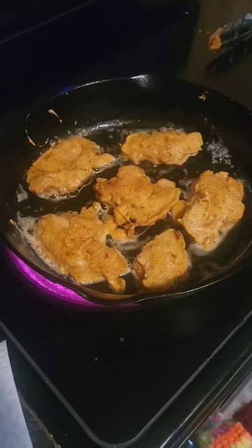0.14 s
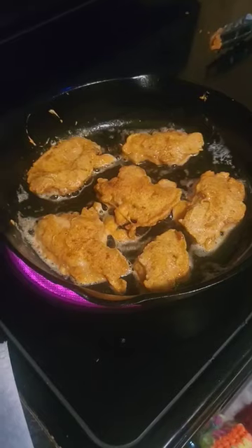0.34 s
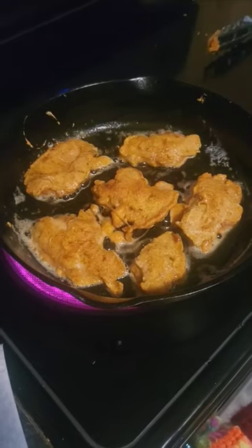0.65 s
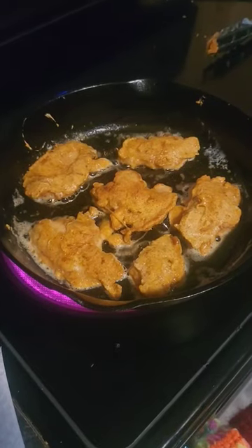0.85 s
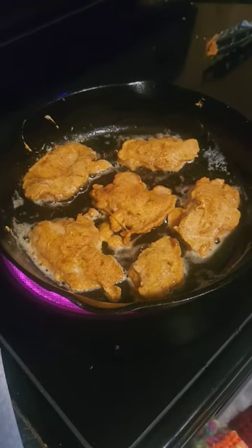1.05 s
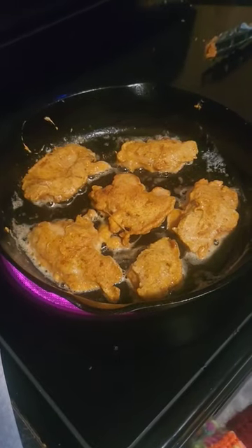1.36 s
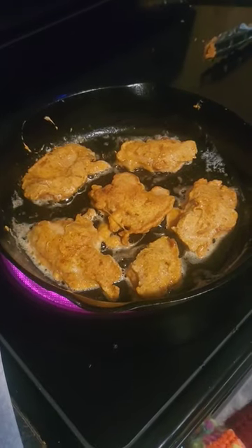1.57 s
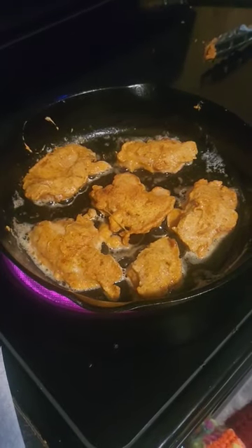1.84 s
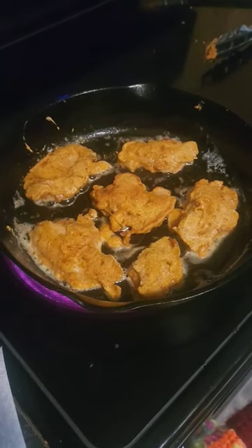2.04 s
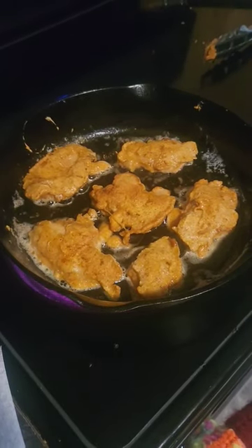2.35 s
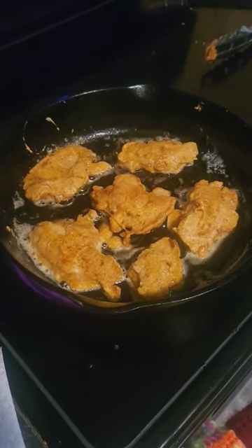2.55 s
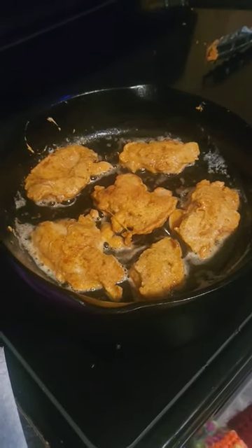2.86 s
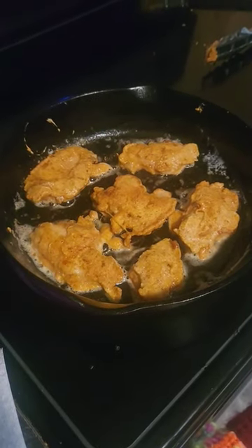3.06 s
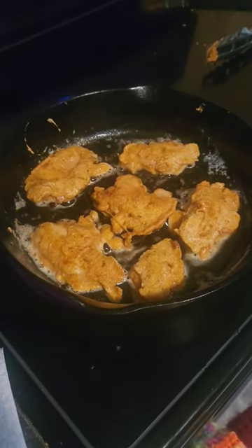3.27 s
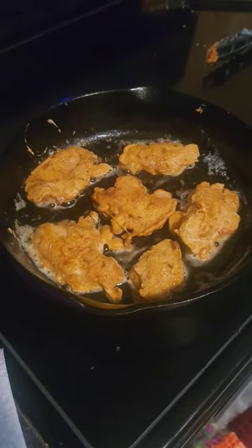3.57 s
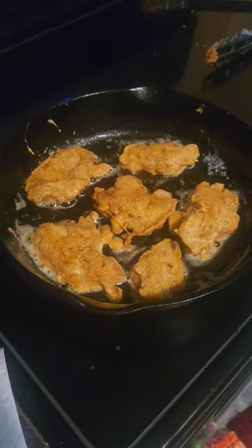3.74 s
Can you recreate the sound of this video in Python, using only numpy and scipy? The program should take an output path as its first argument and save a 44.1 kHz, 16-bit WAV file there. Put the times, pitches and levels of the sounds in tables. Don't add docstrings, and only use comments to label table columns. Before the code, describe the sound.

Breaded fish sizzles in a pan of oil, spitting and snapping over faint hood fan hum.

```python
import sys
import numpy as np
from scipy import signal
from scipy.fft import rfft, irfft, next_fast_len
from scipy.io import wavfile
from scipy.ndimage import uniform_filter1d, map_coordinates

SR = 44100
rng = np.random.default_rng(int(sys.argv[2]) if len(sys.argv) > 2 else 0)


def elevation(decibels):
    levels = np.asarray(decibels, float)
    return 10 ** (levels / 20)


def int16_out(signal):
    q = np.round(np.clip(np.atleast_2d(signal).T, -1, 1) * 32767)
    wavfile.write(sys.argv[1], SR, q.astype(np.int16))


N = 172431
START_S = .1617

# time_s, vigour_db, fine_spatter_over_it_db
BOIL_COURSE = [(.16, -50, -3.5), (.45, -51.5, -5), (.6, -51, -4.5), (.9, -52, -1), (1.1, -49.5, -4.5),
               (1.4, -52.5, -1), (1.63, -51, -4.5), (1.74, -53, -12.5), (1.9, -50, -9), (2.095, -49, -9),
               (2.11, -46, -1.5), (2.19, -48, 3), (2.36, -50, -2), (2.9, -50, -1), (3.25, -49.5, 1),
               (3.45, -49.5, -0.5), (3.7, -48.5, -3), (3.91, -51, -1)]
# start_s, peak_db, tilt_db_per_octave (bubble size), splutter_0_to_1
BIG_POPS = [(0.254, -20, -5, 0.6), (0.544, -18, 1, 0.3), (0.5804, -18.5, 2, 0.6),
            (0.7796, -16.5, -0.5, 0.6), (1.0236, -16.5, -6, 0.1), (1.0843, -14, -4, 0.7),
            (1.1827, -21, -10, 0.5), (1.3045, -31, 8, 0), (1.4591, -13, -1.5, 0.54),
            (1.5303, -14, -7.5, 0.23), (1.5415, -16.5, -4, 0.6), (1.6531, -20, 1, 0),
            (1.724, -23, -1.5, 0.6), (1.7944, -20, -5, 0.7), (1.8457, -31, 1, 0.5), (2.0255, -15, 0, 0),
            (2.0931, -10, -4.5, 0.3), (2.1083, -10.5, -17.5, 0.6), (2.183, -12, 3, 0.6),
            (2.336, -12, 0, 0.2), (2.5902, -9, -3.5, 0.2), (2.6454, -13, -0.5, 0.47),
            (2.7122, -21, -6, 0.8), (3.1578, -25, -11, 0.8), (3.2376, -13.5, -4.5, 0.97),
            (3.3756, -14, -3, 0), (3.6863, -10, 6, 0.8), (3.713, -5, 2.5, 0.2), (3.8078, -17, 0, 0.3),
            (3.8332, -14, -8.5, 0.32)]
# start_s, peak_db,
# tilt_db_per_octave
SMALL_SNAPS = [(0.2638, -19, -3), (0.396, -19, -4), (0.7617, -36, 3), (0.8709, -27, -2), (0.9767, -34, -6),
               (1.1362, -17, 4), (1.2815, -34, 9), (1.4451, -37, 6), (1.491, -16.5, -3), (1.6177, -37, 5),
               (1.8767, -16, 3), (1.915, -21, -7), (1.9955, -14, -2.5), (2.079, -15, -5), (2.085, -15, -4),
               (2.1192, -17, -4), (2.2084, -20, -3), (2.4844, -22, 5), (2.6235, -15, -3.5), (3.033, -34, 3),
               (3.1418, -16.5, -7), (3.1516, -21, -1), (3.2658, -12.5, -2), (3.4208, -23, -9),
               (3.466, -22, -8), (3.784, -33, -11), (3.856, -22, -2.5), (2.5585, -21, -1), (2.682, -19, -8),
               (2.6955, -21, -1), (2.7262, -19, -4), (3.8692, -20, -1)]
# start_s,
# peak_db, tilt_db_per_octave
TICK_RUNS = [(0.326, -40, -2), (1.073, -25, -10), (1.34, -33, -5), (1.512, -23, -0.5), (1.608, -36, -2),
             (1.634, -22.5, 2), (1.677, -25, -1), (1.687, -33, -5), (1.763, -35, -6), (1.802, -27, -4),
             (1.968, -34, -4), (2.033, -28, -2), (2.175, -25, -2), (2.19, -28, 2), (2.263, -31, -6),
             (2.286, -21.5, -5), (2.409, -40, 6), (2.749, -28, -7), (2.892, -35, -4), (2.939, -24, -1.5),
             (3.138, -27, -1), (3.16, -33, -2), (3.213, -35, -2), (3.23, -27, -7), (3.25, -23, -4),
             (3.26, -21.5, -1.5), (3.288, -28, -3), (3.427, -30, -4), (3.496, -35, -2), (3.549, -33, -2),
             (3.609, -31, -8)]
# start_s, peak_db, pitch_hz
RINGING_CAVITIES = [(.253, -34, 1250), (.78, -35, 2460), (1.023, -35, 2450), (1.459, -34, 2450),
                    (1.53, -21.5, 2070), (1.724, -32.5, 2120), (1.794, -30.5, 2100), (1.846, -34.5, 2290),
                    (2.093, -25, 2550), (2.107, -25.5, 1200), (2.589, -28, 2600), (2.645, -33, 2510),
                    (2.749, -30, 1830), (3.142, -34, 2440), (3.152, -34, 2390), (3.16, -29.5, 2060),
                    (3.237, -30, 2620), (3.375, -31, 2540), (3.496, -32, 900), (3.713, -30, 2500),
                    (3.833, -27, 2550)]
# frequency_hz, scatter_over_direct_db
SCATTER_SHARE = [(300, 8), (1300, -6.5), (3000, 7.5), (4500, 11.5), (6200, -2.5), (9500, 15.5), (13000, -4),
                 (15000, 8)]
# centre_hz, width_hz, gain_db
BOWL_MODES = [(656, 66, 6.5), (1002, 42, 4), (1216, 46, 5.5), (2120, 137, 2.5), (2600, 200, 3),
              (6150, 184, 3), (7020, 157, -8), (7780, 220, 5), (9260, 520, -3.5), (10320, 84, 6.5),
              (11260, 100, 1.5), (11950, 240, 6), (13040, 180, 8), (14100, 520, 1.5)]
# frequency_hz, gain_db
LEFT_PORT = [(230, -32.5), (480, -23.5), (1200, -12.5), (1700, -12), (3000, -5), (6000, 2), (9000, -1),
             (15000, -0.5)]
# frequency_hz, gain_db
RIGHT_PORT = [(230, -40.5), (480, -15.5), (1200, -1.5), (2200, 3.5), (3500, -2), (6000, -9), (9000, -12),
              (15000, -11)]
# frequency_hz, level_db
BUMP_KNOCK = [(150, -6), (250, -5), (410, 0), (800, -16)]
# frequency_hz, level_db
BUMP_TAIL = [(120, -6), (180, 0), (270, -8), (400, -22)]
# frequency_hz, level_db_per_hz
FAN_RUMBLE = [(22, -18), (40, -4.5), (65, 1.5), (125, -8), (175, -31.5), (228, -42.5), (310, -40),
              (600, -67)]
# frequency_hz, level_db_per_hz
DUCT_AIR = [(200, -30), (260, -4), (320, -1), (400, -7), (500, -39)]
# time_s, pull_db
AIR_PULL = [(0.17, -44.5), (0.22, -46), (0.43, -51.5), (0.45, -43.5), (0.93, -44), (0.95, -49), (1.02, -40),
            (1.31, -46.5), (1.37, -40.5), (1.4, -46), (1.74, -42.5), (2.9, -48), (2.94, -42), (3.03, -48),
            (3.06, -43.5), (3.77, -46), (3.81, -52), (3.9, -41)]
# frequency_hz, correlation
PORTS_ALIKE = [(30, 1), (70, 0.99), (140, 0.68), (250, 0.88)]
# frequency_hz, floor_db
RIGHT_FLOOR = [(3000, -100), (5000, -90), (7000, -87), (12000, -88), (14500, -87), (15400, -80)]


def unit(x):
    return x / np.sqrt(np.mean(x ** 2) + 1e-20)


def along(points, hz):
    f, v = np.transpose(points)
    return np.interp(np.log(hz + 1), np.log(f + 1), v)


def wobble(rate):
    knots = rng.standard_normal(int(N * rate / SR) + 4)
    return map_coordinates(knots, [np.arange(N) * rate / SR])


def filtered(x, response):
    m = next_fast_len(N + 8192)
    return irfft(rfft(x, m) * response(np.fft.rfftfreq(m, 1 / SR)), m)[..., :N]


def highpass(x, corner_hz):
    return filtered(x, lambda hz: 1 / (1 + (corner_hz / (hz + 1)) ** 4))


def causal(x, gain_db):
    size = 4096
    cepstrum = irfft(np.log(elevation(gain_db(np.fft.rfftfreq(size, 1 / SR)))))
    cepstrum[1:size // 2] *= 2
    cepstrum[size // 2 + 1:] = 0
    return signal.fftconvolve(x, irfft(np.exp(rfft(cepstrum))))[:N]


def bursts(count):
    size_spread_db, biggest, cycles = 4, 3.7, .8
    u, t = rng.random((count, 3)), np.arange(96) / SR
    hz = 300 + 16500 * u[:, 1:2] ** 1.276
    size = elevation(size_spread_db * np.minimum(-np.log(u[:, 2:]), biggest)) * np.sqrt(hz / 4000)
    grains = size * np.sin(2 * np.pi * hz * t) * np.exp(-t * hz / cycles)
    at = (u[:, :1] * N).astype(int) + np.arange(len(t))
    return unit(np.bincount(at.ravel(), grains.ravel(), N + len(t))[:N])


def vigour(x):
    s, boil_db, fine_db = np.transpose(BOIL_COURSE)
    t = np.arange(N) / SR
    fine = highpass(x, 7500)
    coarse = x - fine
    clump_db = 1.57 * wobble(9) + 1.32 * wobble(45)
    fine_gain = elevation(np.interp(t, s, fine_db) + 3.2 * wobble(30.97))
    return elevation(np.interp(t, s, boil_db) + clump_db) * (coarse + fine * fine_gain)


def piece():
    bursts_per_s, hiss_db = 3600 / 6, -3.5
    crackle = bursts(int(bursts_per_s * N / SR))
    return vigour(crackle + elevation(hiss_db) * rng.standard_normal(N))


def pops(rows):
    gain_db, pivot_hz, narrow_db = -4.5, 4300, 1.24
    snap_s, splutter_s, splutter_gain = .0004, .03, .12
    out, t = np.zeros(N + 4096), np.arange(4096) / SR
    octave = np.log2((np.fft.rfftfreq(len(t), 1 / SR) + 200) / pivot_hz)
    for s, db, tilt_db, *splutter in rows:
        lumps = uniform_filter1d(rng.standard_normal(len(t)), size=40) * np.sqrt(40)
        spit = rng.standard_normal(len(t)) * elevation(7.1 * lumps) * elevation(-60 * t / splutter_s)
        snap = (t == 0) + .25 * rng.standard_normal(len(t)) * np.exp(-t / snap_s / 2)
        x = snap / abs(snap).max() + abs(sum(splutter)) * splutter_gain * spit * (t > snap_s)
        x = irfft(rfft(np.roll(x, 64)) * elevation(tilt_db * octave - narrow_db * octave ** 2))
        out[round(s * SR) - 40:][:len(t)] += elevation(db + gain_db) * x / abs(x[:192]).max()
    return highpass(out[:N], 510)


def rings(rows):
    gain_db, rise_s, cycles = -4.5, .00076, 2
    out, t = np.zeros(N + 512), np.arange(512) / SR
    for s, db, hz in rows:
        swell = 1 - np.exp(-(t / rise_s) ** 2)
        x = np.sin(2 * np.pi * hz * t) * swell * np.exp(-t * hz / cycles)
        out[round(s * SR):][:len(t)] += elevation(db + gain_db) * x / abs(x).max()
    return out[:N]


def paths(x, wet_db=0):
    lead_s = .00028 + .000015 * rng.standard_normal()
    scatter_s, gap_s, size = .018, .0006, 2048
    t = np.arange(size) / SR
    blocks = np.pad(x, (0, -N % size)).reshape(1, -1, size)
    tail = rng.standard_normal((2, blocks.shape[1], size)) * elevation(-60 * t / scatter_s) * (t > gap_s)
    tail = tail / np.linalg.norm(tail, axis=2, keepdims=True)
    wet = signal.fftconvolve(np.pad(blocks, ((0, 0), (0, 0), (0, 1))), tail, axes=2)
    now, later = wet[..., :size].reshape(2, -1), wet[..., size:].reshape(2, -1)
    scatter = now[:, :N] + np.pad(later, ((0, 0), (size, 0)))[:, :N]
    port = np.array([[0], [1]])
    direct = filtered(x, lambda hz: np.exp(-2j * np.pi * hz * lead_s * port))

    def direct_share(hz):
        return 1 / (1 + elevation(2 * along(SCATTER_SHARE, hz) + 2 * wet_db))

    return (filtered(direct, lambda hz: np.sqrt(direct_share(hz)))
            + filtered(scatter, lambda hz: np.sqrt(1 - direct_share(hz))))


def patchy(x):
    z = signal.stft(x, nperseg=512)[2]
    field = uniform_filter1d(rng.standard_normal(z.shape[1:]), size=12, axis=0)
    field = uniform_filter1d(field, size=10, axis=1)
    return signal.istft(z * elevation(.5 * unit(field)), nperseg=512)[1][:, :N]


def bowl_db(hz):
    return sum(db * np.exp(-((hz - c) / w) ** 2 / 2) for c, w, db in BOWL_MODES)


def frying():
    pan = patchy(sum(paths(piece()) for _ in range(6)))
    ticks = [(s, db + 8, tilt_db) for s, db, tilt_db in TICK_RUNS]
    snapping = BIG_POPS + SMALL_SNAPS + ticks
    for k in range(3):
        pan = pan + paths(pops(snapping[k::3]) + rings(RINGING_CAVITIES[k::3]), wet_db=-12)
    ports = zip(pan, (LEFT_PORT, RIGHT_PORT))
    return np.array([causal(x, lambda hz: along(port, hz) + bowl_db(hz)) for x, port in ports])


def low_pair(spectrum):
    def mid_side(hz):
        turn = np.arccos(np.clip(along(PORTS_ALIKE, hz), -1, 1)) / 2
        return elevation(along(spectrum, hz)) * np.array([np.cos(turn), np.sin(turn)])

    pan_db = -7
    mid, side = filtered(rng.standard_normal((2, N)), mid_side)
    return unit(np.array([mid + side, mid - side])) * elevation([[pan_db / 2], [-pan_db / 2]])


def thud():
    start_s, rise_s = 1.952, .0016
    t = np.maximum(np.arange(N) / SR - start_s, 0)
    out = 0
    for db, t60_s, body in ((-51, .12, BUMP_KNOCK), (-53, .45, BUMP_TAIL)):
        out = out + elevation(db - 60 * t / t60_s) * low_pair([(60, -60)] + body + [(2000, -67)])
    return (1 - np.exp(-t / rise_s)) * out


def fan():
    hum_hz, hum_db, settle_s = 119.7, -62.5, .003
    t = np.arange(N) / SR
    hum = elevation(hum_db + wobble(1.6)) * np.sin(2 * np.pi * hum_hz * t + .26 * wobble(5.7))
    pull_db = np.interp(t, *np.transpose(AIR_PULL))
    air = elevation(-1.5 + pull_db + 1.5 * wobble(16)) * low_pair(FAN_RUMBLE)
    duct = elevation(-77 + 4 * wobble(7)) * low_pair([(60, -90)] + DUCT_AIR + [(900, -90)])
    return (air + duct + hum * elevation([[-2], [2]])) * np.clip((t - START_S) / settle_s, 0, 1)


def scene():
    return frying() + thud() + fan()


def muted(x):
    hz, _, z = signal.stft(x, SR, "cosine", nperseg=2048)
    width = 8
    power = (abs(z[1, :-1]) ** 2).reshape(-1, width, z.shape[-1]).mean(axis=1)
    floor = elevation(2 * along(RIGHT_FLOOR, hz[width // 2::width]))
    z[1, :-1] *= np.repeat(power > floor[:, None], width, axis=0)
    return signal.istft(z, SR, "cosine", nperseg=2048)[1][:, :N]


def low_pass(x):
    return signal.sosfilt(signal.butter(12, 16500, fs=SR, output="sos"), x)


def record(dry):
    limited = filtered(dry, lambda hz: hz < 15450)
    mix = muted(limited) * (np.arange(N) > START_S * SR)
    return low_pass(mix)


dry = scene()
out = record(dry)
int16_out(out)
```